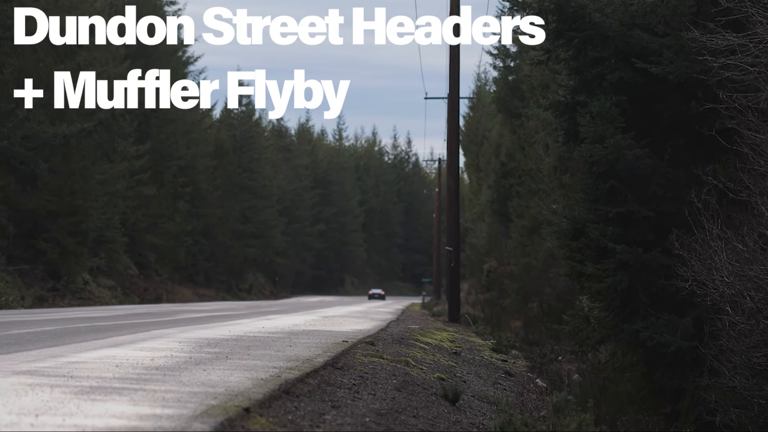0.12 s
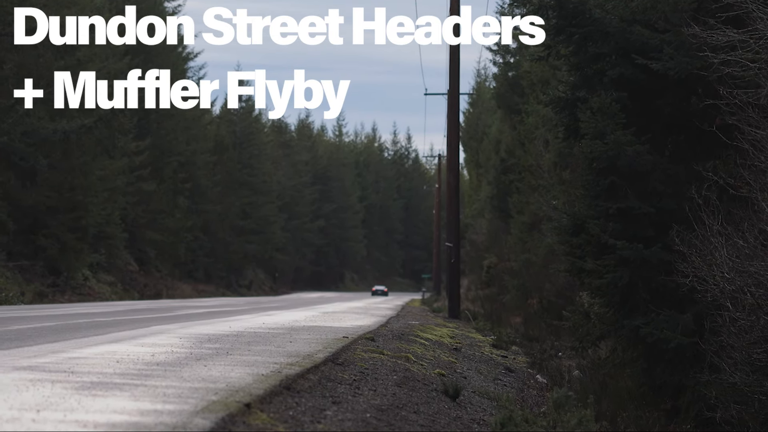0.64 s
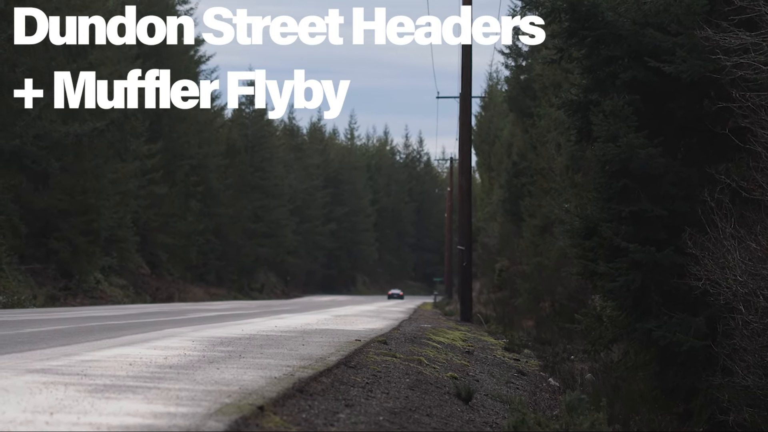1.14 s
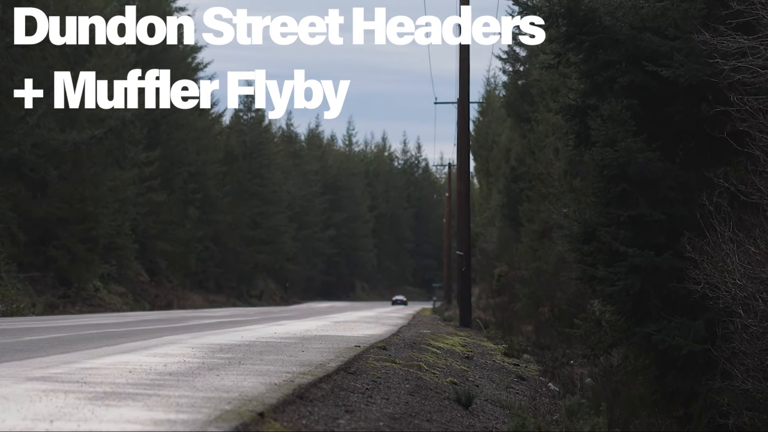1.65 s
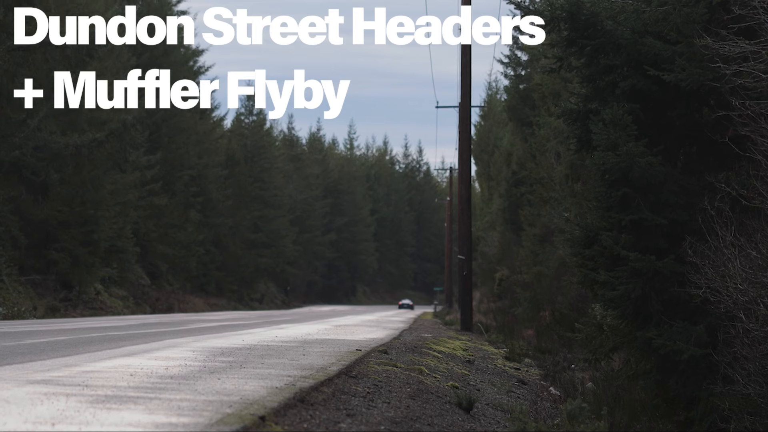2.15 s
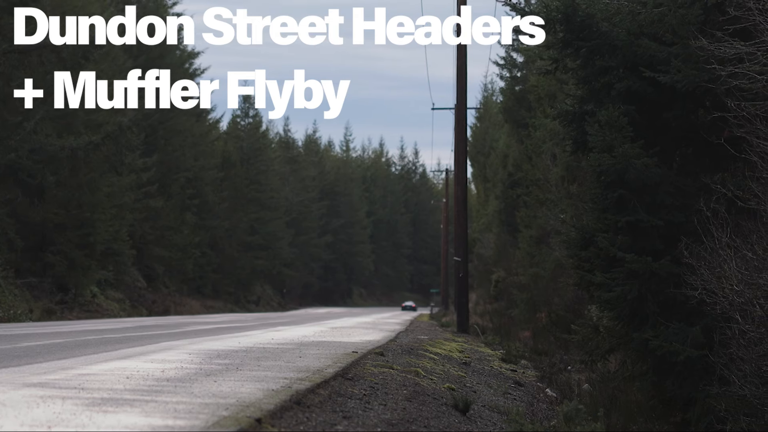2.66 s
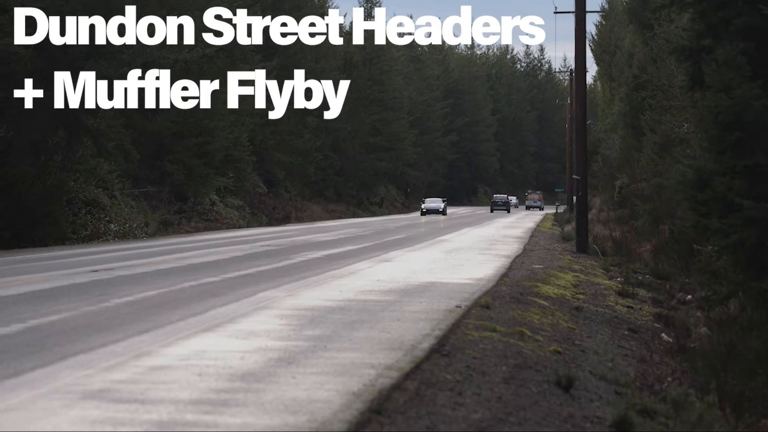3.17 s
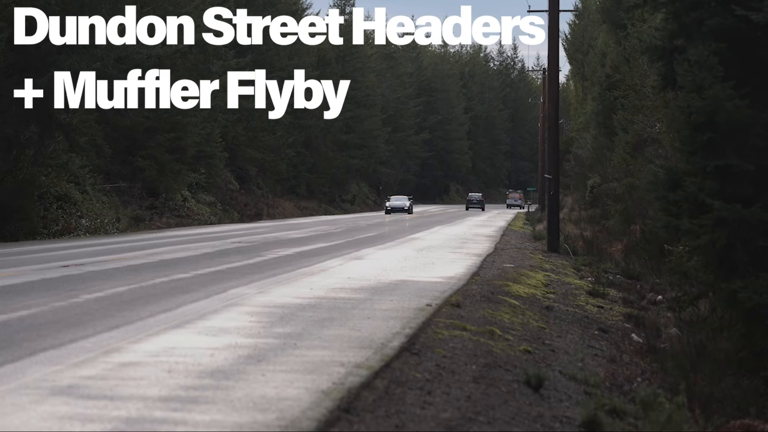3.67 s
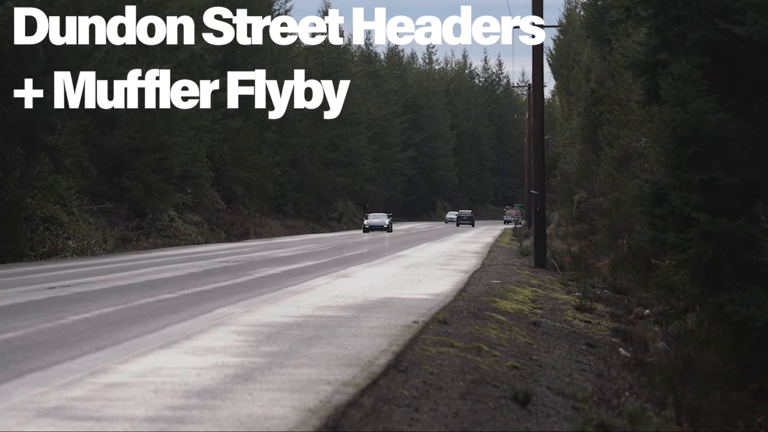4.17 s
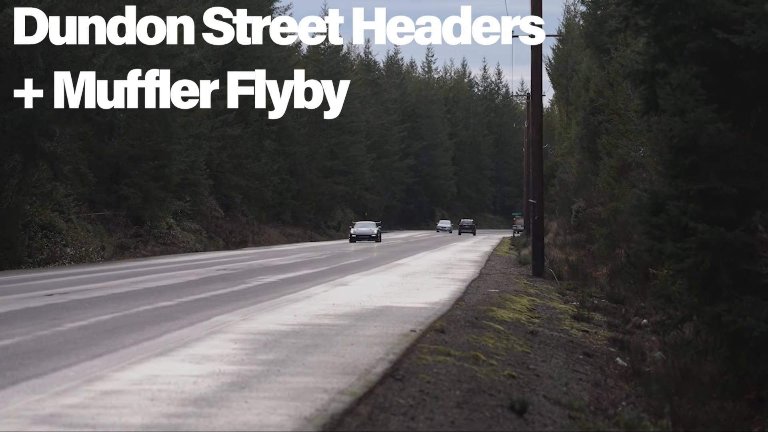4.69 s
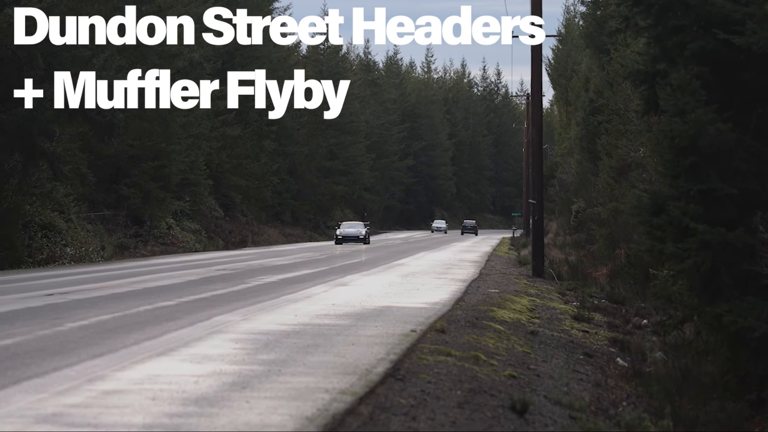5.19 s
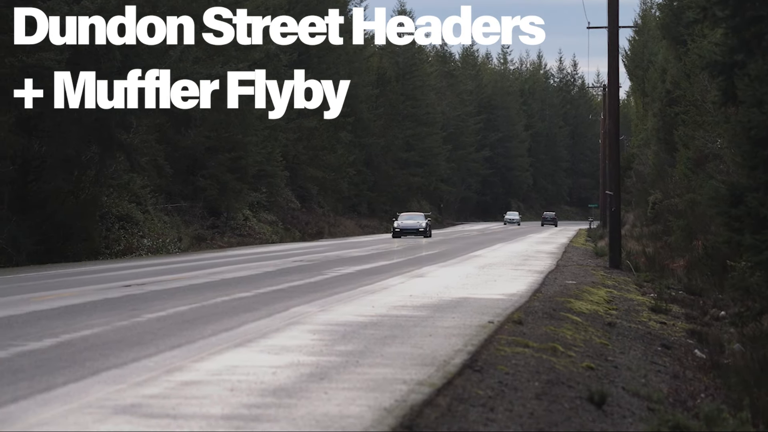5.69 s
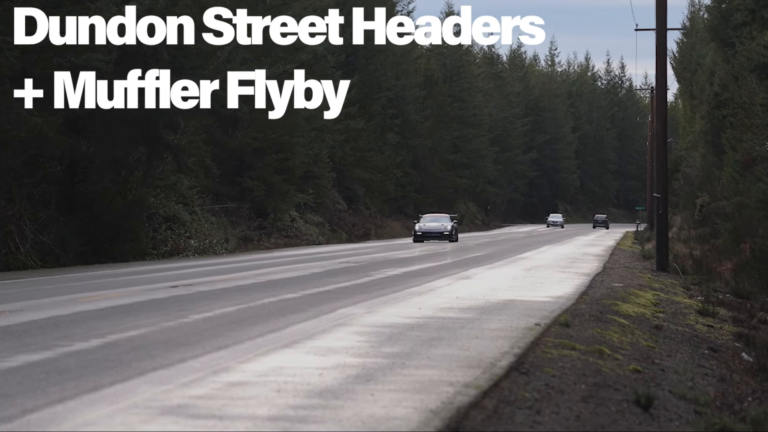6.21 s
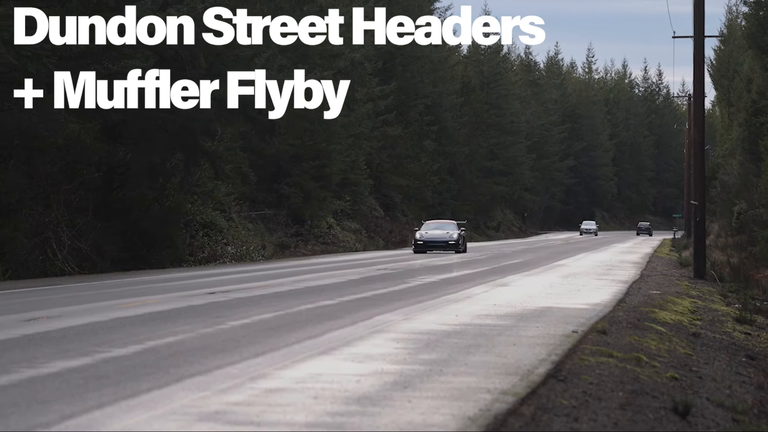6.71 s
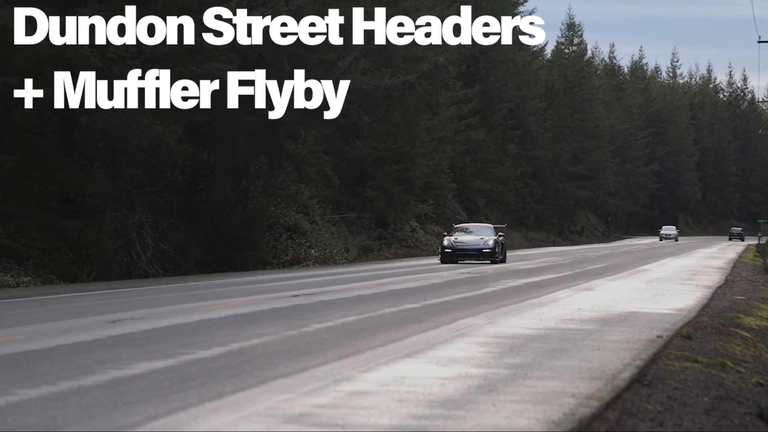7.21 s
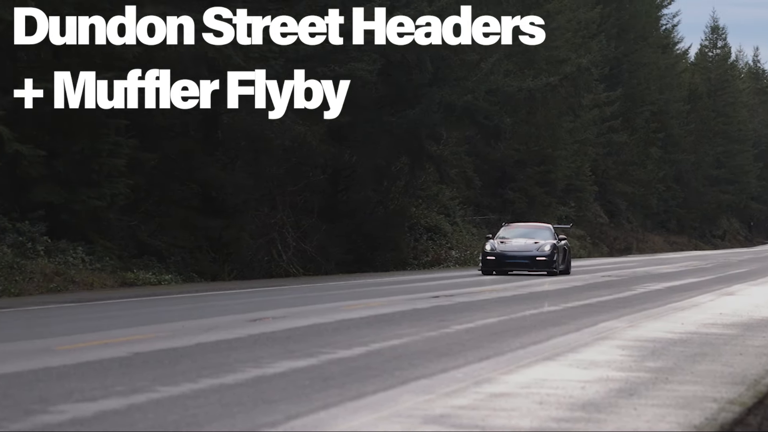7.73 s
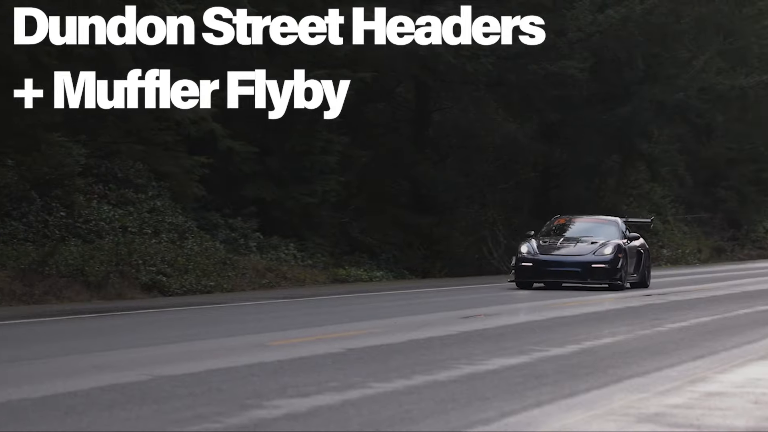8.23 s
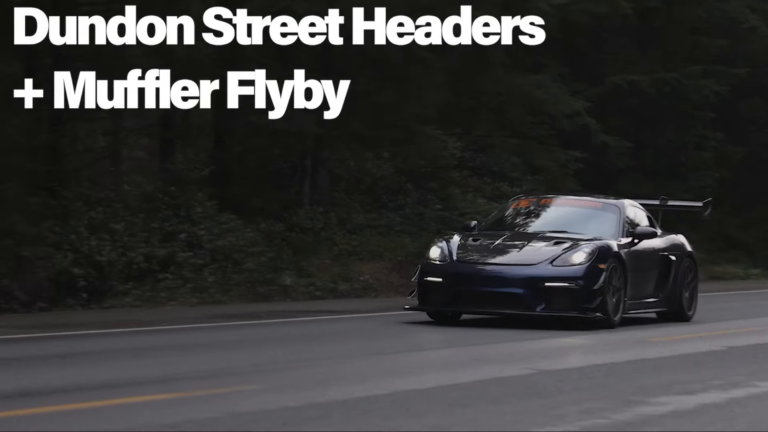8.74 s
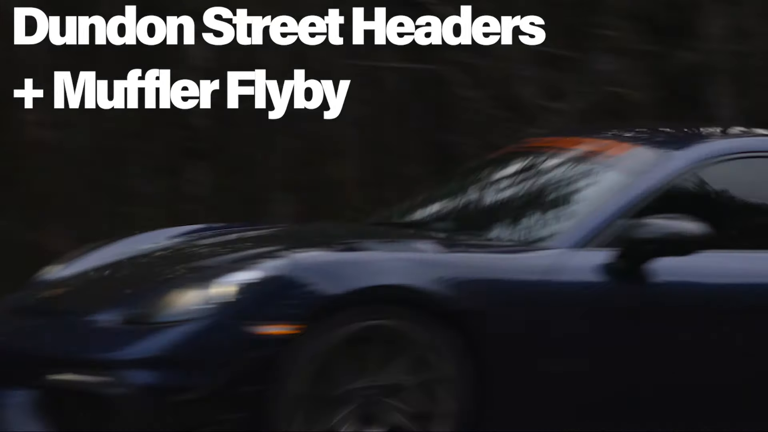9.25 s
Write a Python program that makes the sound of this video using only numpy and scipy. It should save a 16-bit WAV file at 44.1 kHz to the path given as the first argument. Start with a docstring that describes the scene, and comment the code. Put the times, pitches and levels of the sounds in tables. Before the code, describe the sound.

A distant sports car coasts and blips its throttle, then after a hard cut accelerates closer through two upshifts, swelling to a loud, bright exhaust howl.

```python
"""Forest road between walls of trees, one microphone at the verge; a flat-six sports car in two shots.
Far off it recedes: it coasts in gear, blips the throttle and settles lower. After a hard edit it pulls
towards the microphone through two upshifts, louder and brighter. Engine orders are sums of cosines; gas
and tyre roar is coloured noise pulsed by the firing; two climbing intake howls and a late fuzzy band near
1 kHz are narrow noise. Trunk echoes, road rumble that swells at times and microphone hiss lie behind."""
import sys
import numpy as np
from scipy import signal
from scipy.fft import rfft, irfft
from scipy.io import wavfile
from scipy.ndimage import uniform_filter1d

SR = 44100
rng = np.random.default_rng(int(sys.argv[2]) if len(sys.argv) > 2 else 0)


def voltage_ratio(decibels):
    """Convert decibels (scalar or array-like) to amplitude ratios, 20 dB per decade."""
    exponent = np.asarray(decibels, float) / 20
    return 10 ** exponent


def generate_wav(signal):
    """Clip the signal to [-1, 1] and save it as 16-bit WAV at the path in sys.argv[1]."""
    frames = np.transpose(np.atleast_2d(signal))
    scaled = np.clip(frames, -1, 1) * 32767
    pcm = np.round(scaled).astype(np.int16)
    wavfile.write(sys.argv[1], SR, pcm)


N = 413216
TIME = np.arange(N) / SR
EDIT_S = 3.1795  # the far shot ends, the near shot begins
LEVEL_S = 9.93  # the car would draw level just after the end

# Near shot, full throttle through three gears; the pitch sags as the car draws level:
# (time [s], firing rate [Hz], roar level at 1.5-3 kHz [dB])
PULL = [(3.17, 126.6, -56), (3.57, 140.8, -50.5), (3.8, 155.6, -47.5), (4.02, 168.8, -45.5),
        (4.3, 187.6, -45), (4.45, 195.6, -45), (4.71, 212.2, -45.5), (5.15, 239.6, -42.5),
        (5.79, 276.1, -38), (5.852, 279, -37.5), (5.895, 220, -40.5), (5.93, 204.1, -41.5),
        (6.21, 214.4, -40.5), (6.62, 229.3, -39), (7.47, 258.9, -33), (8.23, 283.8, -27), (8.422, 289, -25),
        (8.47, 226.2, -28.5), (8.66, 229.4, -28), (8.93, 234.5, -26.5), (8.96, 235.5, -24),
        (9.07, 236.9, -21.5), (9.21, 232.3, -22), (9.37, 222.6, -20.5)]
# Main firing harmonics: (multiple of firing rate, level against roar [dB])
FIRING_ORDERS = [(1, -7.5), (2, 8.5), (3, 0), (4, 0.5), (5, -0.5)]
# Upper orders, some favoured by the uneven manifolds: (multiple of firing rate, level against roar [dB])
UPPER_ORDERS = [(6, 0), (7, -5), (8, -1), (9, -2), (10, -2), (11, -1), (12, -4), (13, -3), (14, -4),
                (15, -5), (16, -5), (17, -4), (18, -4), (19, -4), (20, -6)]
# Crank orders, three firings a turn: (multiple of crank speed, level against roar [dB])
CRANK_ORDERS = [(2, -23), (4, -24), (8, -16.5)]
# Muffler lifting or choking the firing harmonics: (frequency [Hz], gain [dB])
MUFFLER = [(130, -7), (200, -0.5), (240, 6.5), (280, 2), (340, -2.5), (430, 1.5), (490, 1.5), (550, 0.5),
           (590, -3), (700, -3), (800, -2.5), (860, -4), (950, 3), (1100, 3.5), (1200, 3), (1400, 7.5)]
# Exhaust resonances acting on the upper orders: (frequency [Hz], gain [dB])
PIPE = [(800, -18), (1100, -0.5), (1450, -8.5), (1900, -6), (2400, -20), (2900, -12.5), (3600, -22.5),
        (4200, -22), (5000, -35.5)]
# Weak radiation of the deepest crank orders: (frequency [Hz], gain [dB])
LOW_CUT = [(85, -15.5), (125, -0.5)]
# Near roar colour: (frequency [Hz], relative density [dB per Hz])
NEAR_ROAR = [(30, -56), (110, -22.5), (200, -7), (330, -10), (450, -3), (650, -5.5), (780, -9.5),
             (1050, 1.5), (1450, -6.5), (1900, -7.5), (2600, -15.5), (3400, -19), (4100, -22),
             (5000, -27.5), (8000, -35), (15500, -54)]
# Body of the roar, mostly below 1 kHz, against revs: (firing rate [Hz], gain [dB])
BODY = [(128, 9), (160, 1.5), (200, 1), (235, -1.5), (270, -3), (290, -7)]
# Spells of brighter or duller treble: (time [s], half length [s], gain at 8 kHz [dB])
SHEEN = [(3.9, .3, 2.5), (5.4, .3, 2), (6.4, .5, -2)]
# Narrow noise bands, two climbing intake howls, then a fuzzy band near 1 kHz:
# (time [s], frequency [Hz], fuzz level [dB])
NARROW_BANDS = [
    [(4.6, 592.3, -58), (5.3, 649.5, -44.5), (5.7, 683, -41), (5.87, 687.4, -41)],
    [(5.92, 546, -39.5), (6.2, 570.3, -49), (6.7, 594.5, -38.5), (7.2, 601.8, -32), (7.6, 634.6, -28),
     (7.9, 667, -25), (8.3, 681.5, -24.5), (8.39, 684, -27), (8.42, 686, -18), (8.445, 689.6, -22)],
    [(8.94, 1009, -24), (9.03, 1051, -21), (9.15, 1000, -22), (9.24, 1061, -26)],
]
# Far shot, coasting in gear: (time [s], engine cycles [Hz], tone level [dB], roar level at 1.5-3 kHz [dB])
COAST = [(0.0, 47.9, -57, -45), (0.062, 48.46, -55, -49.5), (0.36, 46.93, -57.5, -48),
         (0.383, 46.7, -66, -53), (0.396, 46.75, -55, -47.5), (0.6, 46.16, -57, -52),
         (0.85, 45.83, -57, -50), (1.366, 45.06, -56.5, -55), (1.76, 44.36, -57.5, -52.5)]
# Cycle orders filled in by uneven burn: (multiple of cycle rate, level against tone level [dB])
COAST_ORDERS = [(4, -7.5), (5, -5), (6, 1.5), (8, 1.5), (9, -2.5), (11, -12), (12, -1), (15, -4), (17, -7),
                (18, 0), (19, -7), (20, -7), (21, 4), (22, -5), (23, -4), (24, -2), (26, -1), (33, -3.5),
                (39, -7), (40, -9), (42, -5), (43, -12), (45, -5.5)]
# Far roar colour: (frequency [Hz], relative density [dB per Hz])
FAR_ROAR = [(30, -17), (130, -15.5), (220, -5.5), (400, -5), (620, -13.5), (950, -2), (1320, -13.5),
            (2050, -3), (2500, -29), (4000, -32.5), (6500, -47.5), (10000, -65), (15500, -72)]
# Throttle blip, then settling: (time [s], firing rate [Hz], roar level at 0.7-1.5 kHz [dB])
SETTLE = [(1.75, 254.8, -49), (1.8, 263.3, -51.5), (1.87, 265.4, -54.5), (1.89, 249, -49),
          (1.935, 273.5, -52), (1.97, 245.2, -54), (2.05, 241, -50), (2.13, 232, -57), (2.2, 227, -54.5),
          (2.29, 221.7, -58.5), (2.4, 215.8, -56), (2.6, 204, -60), (3.18, 205.2, -59.5)]
# Settling tones: (multiple of firing rate, level [dB])
SETTLE_ORDERS = [(1, -55), (2, -59), (4, -67)]
# Tones once the revs hold: (multiple of half the firing rate, level [dB])
HALF_ORDERS = [(9, -63), (15, -69), (19, -74)]
# Settled roar colour: (frequency [Hz], relative density [dB per Hz])
SETTLED_ROAR = [(30, -22), (130, -8), (230, -1), (330, -2.5), (420, -3.5), (600, -11.5), (900, -4),
                (1150, -10), (1550, -8), (2100, -17.5), (2400, -30.5), (4000, -39), (7000, -54),
                (15500, -75)]
# Raspy puffs of gas from the far tailpipes: (time [s], half length [s], treble lift [dB])
RASPS = [(.05, .15, 6), (1.755, .025, 7), (2.0, 0.045, 4.5)]
# Single orders swelling or dropping out: (time [s], multiple of running order, half length [s], gain [dB])
SWELLS = [(.15, 8, 0.29, 6), (.2, 4, .3, 4), (.15, 21, .25, -7), (0.57, 24, .2, -9), (.2, 26, 0.45, -7),
          (0.13, 9, 0.22, -8), (.2, 12, 0.33, -8), (1.83, 1, 0.067, 10.5), (1.92, 1, 0.019, 10),
          (1.96, 1, 0.013, -8), (2.1, 1, 0.24, 4), (2.08, 4, 0.15, 16), (2.18, 2, 0.13, -9),
          (3.45, 2, 0.33, 12.5), (2.9, 5, 0.19, 14), (3.5, 5, .33, 6), (3.55, 9, .33, 5), (5.0, 12, .2, 6),
          (3.8, 7, 0.32, 5.5), (4.14, 10, 0.27, 8.5), (4.17, 6, 0.32, 6.5), (3.8, 3, 0.31, 6.5),
          (4.33, 16, 0.12, 8.5), (4.345, 2, 0.061, -15), (4.3, 4, .45, -4.5), (4.77, 3, .38, -7.5),
          (4.716, 2, 0.28, 5.5), (5.06, 8, 0.37, 8.5), (5.0, 11, 0.25, 9), (5.62, 9, .26, 7.5),
          (5.25, 10, .3, 8), (5.207, 2, 0.21, -9), (5.5, 4, 0.57, 5), (5.68, 5, 0.21, -8.5),
          (5.2, 13, 0.15, 4), (5.75, 14, .12, 6), (6.17, 15, 0.11, 12), (7.1, 17, .35, 9.5),
          (6.22, 10, 0.26, 7), (6.25, 4, 0.27, -14), (6.2, 6, 0.061, 11), (7.2, 8, 1, 5),
          (7.24, 11, 0.34, 5.5), (5.872, 2, 0.0065, -15), (5.83, 4, 0.024, -9), (5.88, 4, .025, 10.5),
          (8.33, 4, .1, 4), (5.6, 15, .22, 12), (3.85, 15, .08, 12), (7.72, 2, 0.94, -10.5),
          (8.21, 3, 0.2, 6.5), (8.204, 10, 0.26, 4.5), (8.3, 12, 0.13, 8), (8.31, 5, 0.12, -5.5),
          (8.46, 2, 0.025, -14), (8.726, 4, 0.24, -15), (8.75, 3, 0.26, 5), (9.0, 4, 0.23, -10),
          (8.93, 1, 0.31, 2), (9.2, 5, 0.23, -5.5), (9.3, 2, 0.13, -9.5), (9.3, 4, 0.1, -17.5)]
# Exhaust thuds, as when ignition cuts and returns: (time [s], level [dB], frequency [Hz])
THUDS = [(1.76, -35.5, 253), (5.855, -37, 152), (5.924, -33, 170), (8.414, -29, 130.1), (8.464, -29.5, 130),
         (9.185, -9, 269.8)]
# Echo decay between the trees: (frequency [Hz], time to fall 60 dB [s])
TREES = [(200, 1), (1000, 1), (4000, 0.39)]
# Swells of the low rumble: (time [s], half length [s], gain [dB])
RUMBLE_SWELLS = [(4.248, 0.14, 12), (5.87, 0.074, 8), (6.45, .4, 7), (8.44, 0.072, 7), (8.9, .4, 5),
                 (9.18, 0.067, 14)]
# Microphone hiss: (frequency [Hz], density [dB per Hz])
HISS = [(30, -100), (300, -112), (3000, -124), (8000, -128), (13000, -133), (16000, -145)]
# Brief burst of side noise: (time [s], side gain before its colour [dB])
SIDE_NOISE = [(8.85, -40), (8.868, -3), (8.94, -1.5), (8.95, -11), (8.975, -14.5), (8.985, -60)]
# Colour of the side noise, mostly treble: (frequency [Hz], gain [dB])
SIDE_COLOUR = [(300, -12), (900, 3)]


def read(points, hz):
    """A spectrum table read on a log frequency axis."""
    f, value = np.transpose(points)
    return np.interp(np.log(hz + 1), np.log(f + 1), value)


def columns(rows, t):
    """Every column of a curve table at times t, and a gate that is open while the table lasts."""
    s, *values = np.transpose(rows)
    gate = np.clip(np.minimum(t - s[0], s[-1] + .01 - t) / .01, 0, 1)
    return gate, [np.interp(t, s, v) for v in values]


def drift(rate_hz):
    """Smoothed random wander of rms about 1, drawn at 40 knots a second."""
    knots = rng.standard_normal(int(N / SR * 40) + 2)
    smooth = signal.lfilter([1], [1, -np.exp(-rate_hz / 40 * 2 * np.pi)], knots)
    return np.interp(TIME * 40, np.arange(len(knots)), smooth / smooth.std())


def bell(t, s, half):
    """A Gaussian bump around s."""
    return np.exp(-((t - s) / half) ** 2)


def plateau(s, half):
    """A flat-topped bump around s."""
    return np.exp(-np.square(np.square((TIME - s) / half)))


def swell_db(multiple):
    """The summed swells of one order."""
    return sum(db * plateau(s, half) for s, k, half, db in SWELLS if round(k) == multiple)


def partial(turns, db, fade_db, spread=1, flutter_db=0):
    """One engine order: moving air fades it, uneven burns flutter it; a small phase spread keeps pulses crisp."""
    level_db = db + fade_db * drift(5.2) + flutter_db * drift(30)
    phase_turns = turns + spread * rng.random()
    return np.sqrt(2) * voltage_ratio(level_db) * np.cos(2 * np.pi * phase_turns)


def roar(firing_turns, throb, colour_db, band, patchy_db):
    """Exhaust and tyre noise puffed out at each firing; colour_db(hz, t) gives shape, level in band and gate."""
    throbbing = (1 + throb * np.cos(2 * np.pi * firing_turns)) / np.sqrt(1 + throb ** 2 / 2)
    puffs = throbbing * rng.standard_normal(N)
    hz, t, z = signal.stft(puffs, SR, nperseg=1024, noverlap=768)
    shape_db, level_db, gate = colour_db(hz[:, None], t)
    shape = voltage_ratio(shape_db) * np.ones(z.shape)
    inside = (hz > band[0]) & (hz < band[1])
    shape /= np.sqrt((shape[inside] ** 2).sum(0) / len(hz))  # the level now holds within the band
    patches = uniform_filter1d(uniform_filter1d(rng.standard_normal(z.shape), 8, 0), 12, 1)
    gain = shape * voltage_ratio(level_db + patchy_db * patches / patches.std()) * gate
    return signal.istft(z * gain, SR, nperseg=1024, noverlap=768)[1][:N]


def near_colour_db(hz, t):
    """Air takes more treble when the car is far; the body thins as the revs climb."""
    gate, (firing_hz, roar_db) = columns(PULL, t)
    air_db = 1.48 * (LEVEL_S - t) - 0.0069 * (299 - firing_hz)  # loss at 8 kHz
    air_db -= 3.5 * np.clip((t - 9.2) / .4, 0, 1)  # treble opens as the tailpipes swing into view
    air_db -= sum(db * bell(t, s, half) for s, half, db in SHEEN)
    loss_db = air_db * (hz / 8000) ** 1.9
    body_db = read(BODY, firing_hz) / (1 + (hz / 1300) ** 4)
    # gas bursts out as the ignition returns after each upshift
    burble_db = sum(4 * bell(t, s, .02) for s in (THUDS[2][0], THUDS[4][0]))
    return read(NEAR_ROAR, hz) - loss_db + body_db, roar_db + burble_db, gate


def pulling():
    """Firing harmonics shaped by muffler and pipe, weaker upper and crank orders, and a brightening roar."""
    _, (hz, roar_db) = columns(PULL, TIME)
    turns = np.cumsum(hz) / SR
    # orders dip while the pitch falls, as when ignition is cut for a shift
    cut_db = np.clip(uniform_filter1d(np.gradient(hz) * SR, 600) / 25, -16, 0)
    tones = np.zeros(N)
    for k, db in FIRING_ORDERS:
        level_db = roar_db + db + swell_db(k) + read(MUFFLER, k * hz) + cut_db * (.12 if k < 3 else 1)
        tones += partial(k * turns, level_db, fade_db=1.5, spread=.45, flutter_db=1.5 * (k > 2))
    for k, db in UPPER_ORDERS:
        level_db = roar_db + db + swell_db(k) + cut_db + read(PIPE, k * hz)
        tones += partial(k * turns, level_db, fade_db=2.5, spread=.45, flutter_db=1.5)
    far_db = 2.5 * (LEVEL_S - TIME)  # crank orders stand out more while the car is far
    for k, db in CRANK_ORDERS:
        level_db = roar_db + db + far_db + cut_db + read(LOW_CUT, k * hz / 3)
        tones += partial(k * turns / 3, level_db, fade_db=2.5)
    return tones + roar(turns, 0.12, near_colour_db, (1500, 3000), patchy_db=1.4)


def narrow_bands(width_hz=38, steady=0.87):
    """Two climbing intake howls, then a fuzzy band near 1 kHz: narrow noise around a steadier core."""
    out = np.zeros(N)
    r = np.exp(-np.pi * width_hz / SR)
    for rows in NARROW_BANDS:
        gate, (hz, db) = columns(rows, TIME)
        noise = rng.standard_normal((N, 2)) @ [1, 1j]
        fuzz = signal.lfilter([1], np.convolve([1, -r], [1, -r]), noise)
        carrier = np.exp(2j * np.pi * np.cumsum(hz) / SR)
        out += gate * voltage_ratio(db) * ((fuzz / fuzz.real.std() + steady) * carrier).real
    return out


def rasp_db(hz, t):
    """Puffs of gas briefly lift the treble around 2.5-5 kHz."""
    lift_db = sum(db * bell(t, s, half) for s, half, db in RASPS)
    return lift_db / (1 + (2500 / (hz + 1)) ** 8 + (hz / 5500) ** 8)


def far_colour_db(hz, t):
    """Roar dulled by distance, whose colour sinks with the pitch."""
    gate, (cycle_hz, _, roar_db) = columns(COAST, t)
    return read(FAR_ROAR, hz * 46.3 / cycle_hz) + rasp_db(hz, t), roar_db, gate


def coasting():
    """A comb of cycle orders from uneven burn, over the far roar."""
    gate, (hz, tone_db, _) = columns(COAST, TIME)
    turns = np.cumsum(hz) / SR
    tones = np.zeros(N)
    for k, db in COAST_ORDERS:
        tones += partial(k * turns, tone_db + db + swell_db(k), fade_db=1.2, spread=0.56)
    # one bank dominates: three puffs a cycle
    return gate * tones + roar(3 * turns, 0.069, far_colour_db, (1500, 3000), patchy_db=1.5)


def settled_colour_db(hz, t):
    """Fixed dull colour, lifted by the rasps."""
    gate, (_, roar_db) = columns(SETTLE, t)
    return read(SETTLED_ROAR, hz) + rasp_db(hz, t), roar_db, gate


def settling():
    """The blip booms near the firing rate; then soft tones waver in pitch over a faint roar."""
    gate, (hz, _) = columns(SETTLE, TIME)
    turns = np.cumsum(hz * (1 + 0.0141 * drift(11.5))) / SR  # uneven burn off the throttle
    tones = np.zeros(N)
    for k, db in SETTLE_ORDERS:
        tones += partial(k * turns, db + swell_db(k), fade_db=2.0)
    for k, db in HALF_ORDERS:
        tones += (TIME > 2.5) * partial(k / 2 * turns, db, fade_db=3.0)
    return gate * tones + roar(turns, 0.18, settled_colour_db, (700, 1500), patchy_db=1.7)


def thuds():
    """Exhaust thuds: a short low push, little more than one cycle."""
    out = np.zeros(N)
    for s, db, hz in THUDS:
        cycles = (TIME - s) * hz
        out += voltage_ratio(db) * bell(cycles, 0, .8) * np.sin(2 * np.pi * cycles)
    return out


def trees(x):
    """Sparse echoes of random sign from the trunks along the road, decaying by frequency."""
    taps = np.zeros(SR)
    at = np.arange(900, SR - 20, 20)  # samples; the nearest trunks answer after about 20 ms
    taps[at + rng.integers(0, 20, len(at))] = rng.choice([-1., 1.], len(at))
    hz, t, z = signal.stft(taps, SR, nperseg=256)
    t60_s = np.clip(read(TREES, hz), .05, 3)[:, None]
    tail = signal.istft(z * voltage_ratio(-60 * t / t60_s), SR, nperseg=256)[1]
    return signal.fftconvolve(x, tail / np.linalg.norm(tail))[:N]


def rumble():
    """Road rumble that swells at times: lumpy low noise that grows as the car nears."""
    band = signal.butter(2, (45, 125), "band", fs=SR, output="sos")
    low = signal.sosfilt(band, rng.standard_normal(N))
    level_db = -56.5 - 2.5 * (LEVEL_S - TIME)
    level_db += sum(db * plateau(s, half) for s, half, db in RUMBLE_SWELLS)
    return voltage_ratio(level_db + 2.4 * drift(8)) * low / low.std()


def hiss():
    """Microphone self-noise and faint rumble: one steady noise, densest in the bass."""
    hz = np.fft.rfftfreq(N, 1 / SR)
    return irfft(rfft(rng.standard_normal(N)) * voltage_ratio(read(HISS, hz)), N) * np.sqrt(SR / 2)


def scene():
    """Two shots joined by a hard edit, each with its own echoes."""
    far = TIME < EDIT_S
    car = np.where(far, coasting() + settling(), pulling() + narrow_bands()) + thuds()
    echo = np.where(far, voltage_ratio(-19) * trees(car * far), voltage_ratio(-18) * trees(car * ~far))
    return np.array([car + echo + hiss() + ~far * rumble()] * 2)


def top_cut(x):
    """Nothing passes above the cut-off."""
    return signal.sosfilt(signal.butter(12, 15750, fs=SR, output="sos"), x)


def record(dry):
    """One microphone on both channels, with a brief burst of side noise; the input rounds the highest peaks."""
    hz, t, z = signal.stft(dry[0], SR, nperseg=1024)
    # random phases turn the car's own spectrum into noise
    z *= voltage_ratio(read(SIDE_COLOUR, hz))[:, None] * np.exp(2j * np.pi * rng.random(z.shape))
    side_db = np.interp(TIME, *np.transpose(SIDE_NOISE), left=-120, right=-120)
    side = voltage_ratio(side_db) * signal.istft(z, SR, nperseg=1024)[1][:N]
    stereo = dry + [side, -side]
    # cubing before tanh leaves all but the highest peaks straight; the complex root allows negatives
    rounded = np.tanh(stereo ** 3 + 1e-18) ** (1 / 3 + 0j)
    mix = np.sign(stereo) * abs(rounded) * .95
    return top_cut(mix)


dry = scene()
out = record(dry)
generate_wav(out)
```